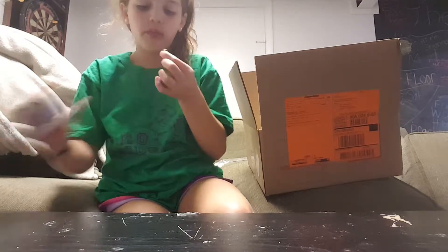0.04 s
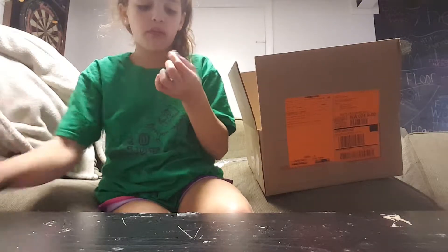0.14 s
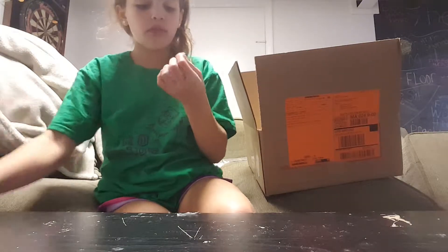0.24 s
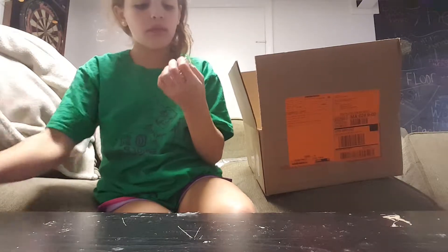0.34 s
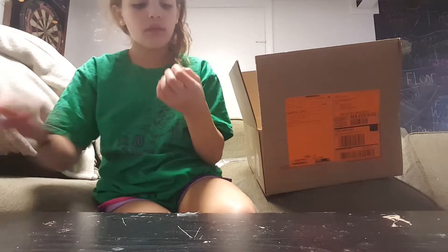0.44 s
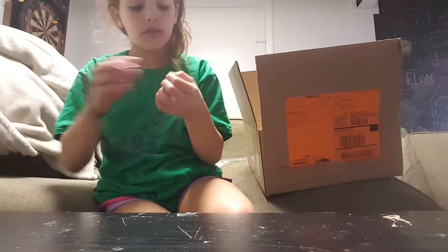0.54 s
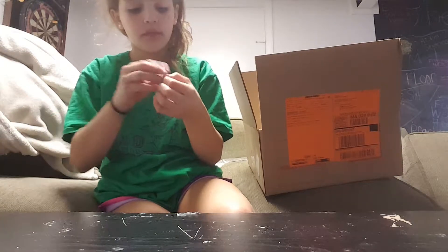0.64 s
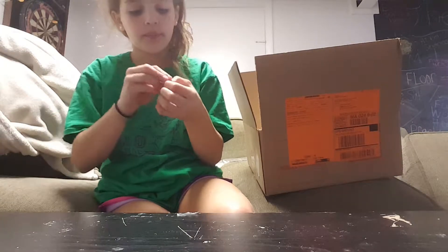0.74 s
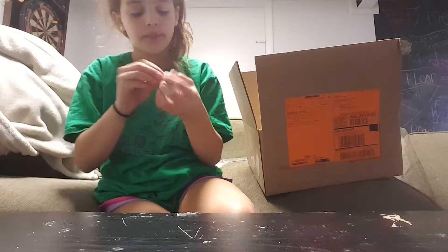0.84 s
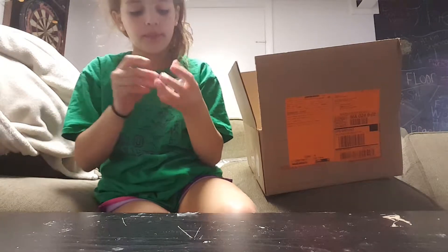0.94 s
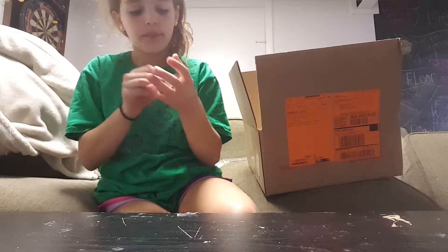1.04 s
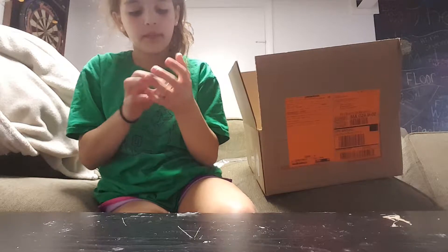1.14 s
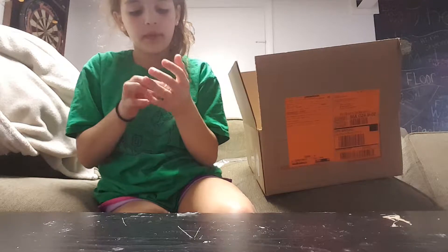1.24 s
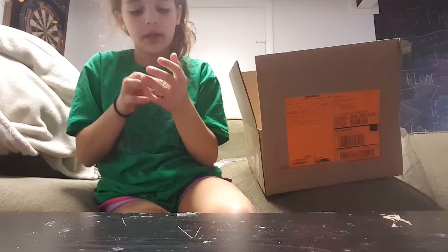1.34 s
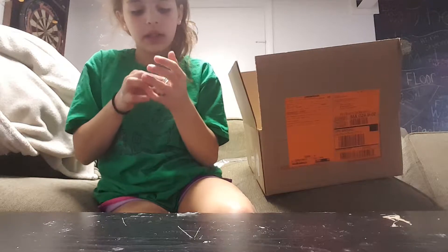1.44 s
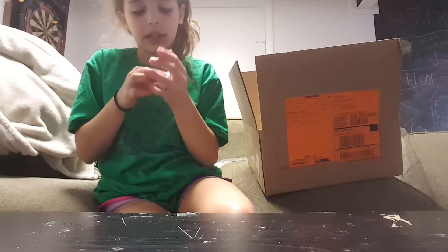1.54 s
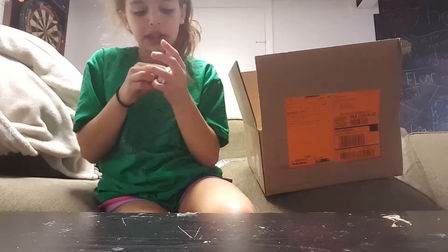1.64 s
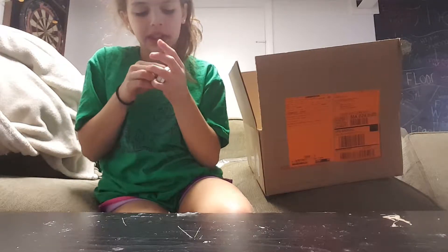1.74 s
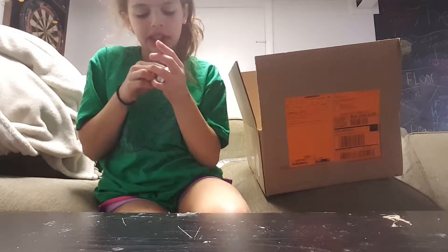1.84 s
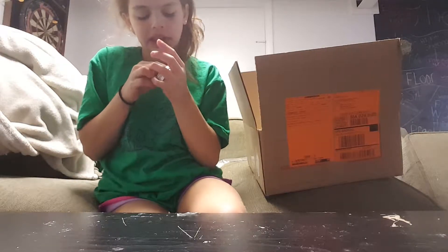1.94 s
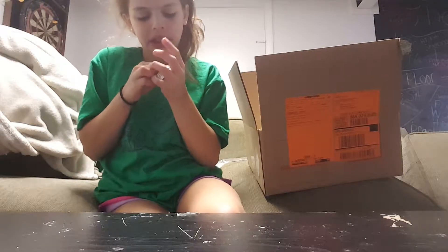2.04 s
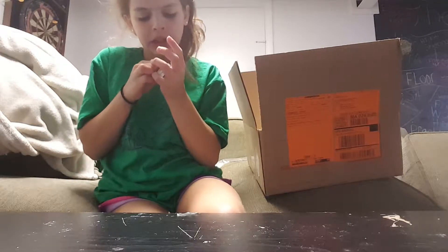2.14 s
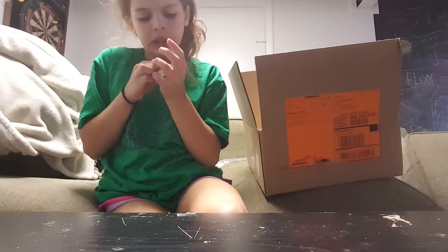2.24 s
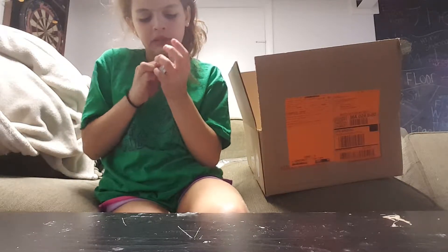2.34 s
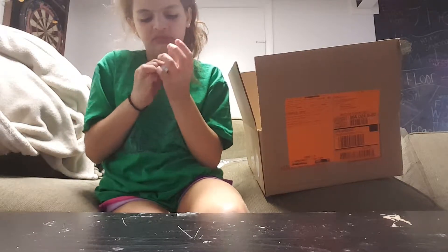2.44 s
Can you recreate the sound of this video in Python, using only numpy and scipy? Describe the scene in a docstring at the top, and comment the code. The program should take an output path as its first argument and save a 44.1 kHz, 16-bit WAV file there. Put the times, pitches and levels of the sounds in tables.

```python
"""A faint tick, then a small metal tin lands on a table to the right, bounces and rattles to rest.
Afterwards fingers pick at sticky putty in a quiet room, while the recorder's gain creeps back up.
The tin is a bank of dying sines struck by listed knocks and random rattle taps, plus contact noise and a thud.
Putty ticks are bursts of noise snaps with a dull ring; shaped noise and hum tones make the background."""
import sys
import numpy as np
from scipy import signal
from scipy.fft import rfft, irfft
from scipy.io import wavfile
from scipy.ndimage import uniform_filter1d

SR = 44100
rng = np.random.default_rng(int(sys.argv[2]) if len(sys.argv) > 2 else 0)


def file_out(sig):
    """Save sig as 16-bit WAV at sys.argv[1]."""
    # one column per channel
    cols = np.atleast_2d(sig).T
    # limit, then scale
    lim = np.clip(cols, -1, 1)
    pcm = np.round(lim * 32767).astype(np.int16)
    wavfile.write(sys.argv[1], SR, pcm)


N = 110250  # samples, 2.5 s


def amp(db):
    """Turns dB into an amplitude factor."""
    return 10 ** (np.asarray(db) / 20)


def evened(x):
    """Scales a sound to an RMS of one."""
    return x / np.sqrt(np.mean(x ** 2) + 1e-20)


def read(points, hz):
    """Reads a curve of (Hz, value) points along a logarithmic pitch axis."""
    f, value = np.transpose(points)
    return np.interp(np.log(hz + 1), np.log(f + 1), value)


def over_time(points, t):
    """Reads a curve of (seconds, value) points."""
    return np.interp(t, *np.transpose(points))


def add(mix, s, sound):
    """Lays a sound into the mix at s seconds, cut off at the end."""
    part = mix[:, round(s * SR):][:, :sound.shape[1]]
    part += sound[:, :part.shape[1]]


def coloured(x, db):
    """Filters along time by a dB value per FFT bin."""
    return irfft(rfft(x) * amp(db), x.shape[-1])


def ring(modes, extra_db, size=9000, on_db=0):
    """Dying sines; each mode reaches the two microphones with its own balance and phase."""
    contact_s = 0.00056  # rise of the ring
    damp_s = 0.014  # contact with the table damps quickly, down to on_db
    hz, db, t60, pan_db, turns = np.transpose(modes)[:, :, None]
    t = np.arange(size) / SR
    side = np.array([.5, -.5])[:, None, None]  # left, right
    rise = np.sin(np.pi / 2 * np.minimum(t / contact_s, 1)) ** 2
    wave = np.sin(2 * np.pi * (hz * t - side * turns)) * rise
    decay = amp(db + extra_db + side * pan_db - 60 * t / t60)
    damped = amp(on_db) + (1 - amp(on_db)) * np.exp(-(t / damp_s) ** 2)
    return (decay * wave).sum(1) * damped


def tin():
    """Knocks and a random rattle ring the same tin; a short noise marks each contact."""
    # Knocks on the table. Each row: start in seconds, level in dB, favoured pitch in Hz,
    # hardness in dB per octave, rim ring in dB relative to the knock.
    knocks = [(.23430, -1, 1182, 0, -40), (.23856, -2, 1182, 1, -40), (.2515, -6, 2290, -2, -50),
              (.2765, -1, 3210, 2, -50), (.2772, -1, 5130, 5, -31), (.2830, -3, 784, -4.5, -20),
              (.3090, -21, 1200, -1, -48), (.3505, -5, 2770, 2, -8), (.3590, -15.5, 4800, 0, -0.5),
              (.4105, -5, 2290, 1, -8), (.4343, -8, 2300, 1, -10), (.4430, -5, 790, 1, -4),
              (.4470, -10, 3020, 2.5, -5), (.4520, -15, 1090, -4, -3)]
    # Tin body. Each row: pitch in Hz, level in dB, T60 in seconds, left minus right in dB, left lag in turns.
    body = [(211, -20, 0.093, 8, 0.3), (437, -13, 0.11, -1, 0.3), (748, -8.5, 0.1, 1.5, 0.23),
            (1181, -6, .045, -1, .1), (1391, -10, 0.029, -1, .15), (1903, -6, .05, 6, .35),
            (2283, -6.5, 0.15, 3.5, .15), (2583, -13, .04, 0.5, 0.17), (2845, -12.5, .06, 2, 0.11),
            (3035, -6, 0.031, -0.5, 0.28), (3350, -14, 0.057, -2.5, 0.32), (4244, -25.5, 0.14, -2, .25),
            (4557, -19, 0.032, -4.5, 0.13), (4710, -16.5, 0.032, -7, 0.29), (6100, -30.5, .05, -0.5, 0.43)]
    # Rim and lid, free to ring once the tin tips on edge. Each row: the same columns as the body.
    rim = [(787, -6, .05, -2, 0.085), (1073.6, -2, .07, 0.15, .1), (3842, -10.5, 0.094, 0, 0.13),
           (6860, -20, 0.13, -2, 0.12), (9800, -33, 0.1, -2, .2), (12380, -39, .09, 0, .2),
           (15100, -47, .08, 0, .2)]
    # Loudness of the rattle. Each row: time in seconds, level in dB.
    rattle = [(.236, -50), (.29, -47), (.335, -57), (.36, -49), (.39, -49), (.405, -52), (.43, -54),
              (.445, -48), (.472, -48), (.488, -66)]
    ring_db, crack_db, uneven_db = -6.5, -9, 3  # ring and contact noise per knock, random spread of modes
    ring_on_db = -10.5  # the part of the body's ring that escapes the table's damping
    thud_hz, thud_db, thud_t60 = 89, -37, 0.35  # table top
    taps_per_s, spread_db, soft_hz = 1800, 5.5, 4630  # rattle density, level spread, treble limit
    rattle_rim_db, rattle_crack_db, tipped_s = -0.5, 8, 0.28  # rim joins in from tipped_s
    low_cut_hz = 56.14  # the tin's sound keeps little deep bass below this

    out = np.zeros((2, N))
    hz = np.array(body)[:, :1]
    t = np.arange(9000) / SR
    thud = amp(thud_db - 60 * t / thud_t60) * np.sin(2 * np.pi * thud_hz * t) * np.ones((2, 1))
    for s, db, near_hz, hard_db, rim_db in knocks:
        shade = colour_db(hz, near_hz, hard_db) + uneven_db * rng.standard_normal(hz.shape)
        ringing = ring(body, shade, on_db=ring_on_db) + ring(rim, rim_db)
        add(out, s, amp(db + ring_db) * ringing)
        # the thud grows with the square of the knock
        add(out, s, amp(db + crack_db) * crack(near_hz, hard_db) + amp(2 * db) * thud)

    taps = rng.choice([-1., 1.], N) * (rng.random(N) < taps_per_s / SR)
    taps *= amp(spread_db * np.minimum(rng.exponential(1, N), 4))
    clock = np.arange(N) / SR
    taps *= amp(over_time(rattle, clock)) * (clock > rattle[0][0]) * (clock < rattle[-1][0])
    soft = signal.sosfilt(signal.butter(2, soft_hz, fs=SR, output="sos"), taps)
    struck = ring(body, 0, on_db=ring_on_db) + amp(rattle_crack_db) * crack(2800, 0)
    out += signal.oaconvolve(soft[None], struck, axes=1)[:, :N]
    tipped = taps * (clock > tipped_s)
    out += signal.oaconvolve(tipped[None], ring(rim, rattle_rim_db), axes=1)[:, :N]
    return signal.sosfilt(signal.butter(2, low_cut_hz, "high", fs=SR, output="sos"), out)


def colour_db(hz, near_hz, hard_db):
    """Where and how hard the tin lands favours one pitch region and tilts the rest."""
    favour_db, favour_oct = 8, 0.051  # height and width of the favoured region
    favoured = favour_db * np.exp(-.5 * (np.log2(hz / near_hz) / favour_oct) ** 2)
    return favoured + hard_db * np.log2(np.maximum(hz, 700) / 2000)


def crack(near_hz, hard_db):
    """Short contact noise; it reaches the left microphone later."""
    # Colour of the contact noise. Each row: pitch in Hz, relative level in dB per Hz.
    contact_colour = [(60, -44), (500, -15), (800, -12.5), (1800, -7), (2800, -11.5), (3800, -19),
                      (5200, -22.5), (7000, -29), (10000, -46), (16000, -64.5)]
    crack_t60, rise_s, left_lag_s = 0.026, 0.00033, 0.00033
    t, hz = np.arange(9000) / SR, np.fft.rfftfreq(9000, 1 / SR) + 20
    shared, own = rng.standard_normal(9000), rng.standard_normal((2, 9000))
    colour = read(contact_colour, hz) + colour_db(hz, near_hz, hard_db)
    noise = evened(coloured(shared + 0.35 * own, colour))
    noise = noise * amp(-60 * t / crack_t60) * np.minimum(t / rise_s, 1)
    return np.array([np.roll(noise[0], round(left_lag_s * SR)), noise[1]])


def ticks():
    """Each tick is a short burst of tiny snaps, each with a bright edge and one dull ring; long ones start softly."""
    # Putty and nail ticks. Each row: start in seconds, length in seconds, ring level in dB, ring pitch in Hz,
    # ring T60 in seconds, snap level in dB, snap pitch in Hz, left minus right in dB.
    picks = [(.1160, 0.00063, -45.5, 1046, 0.049, -57, 2500, 10.5),
             (0.1161, 0.0003, -65, 4230, 0.046, -88, 4050, 0),
             (.8730, 0.0034, -52, 3020, 0.012, -49.5, 4000, 4),
             (1.2885, 0.0029, -59.5, 2500, 0.0098, -57.5, 10980, 0.5),
             (1.3165, 0.0011, -72, 4985, 0.0083, -55, 14500, 7),
             (1.406, 0.00066, -70, 5000, 0.0086, -59.5, 8000, -5),
             (1.431, 0.0051, -50, 2760, 0.018, -56, 9460, 6),
             (1.433, 0.0026, -61, 5400, 0.0089, -48, 13000, -2),
             (1.5800, 0.0013, -63, 1100, 0.062, -48, 7850, 6),
             (1.5856, 0.0031, -55.5, 2550, 0.013, -58, 9000, -2),
             (1.61, 0.0033, -62, 2020, 0.028, -64, 9000, -6),
             (2.072, 0.0073, -61.5, 2270, 0.015, -54, 7000, 2),
             (2.0760, 0.01, -59, 4050, 0.0066, -62.5, 12000, -8),
             (2.24, 0.0005, -45, 430, 0.013, -65, 4430, -1.5),
             (2.266, 0.0025, -66.5, 4000, 0.0082, -60, 11000, 8),
             (2.3010, 0.0018, -58.5, 2980, 0.0057, -65, 10100, 2),
             (2.36, 0.02, -49, 2080, 0.015, -56, 11000, -5),
             (2.358, 0.03, -55, 2700, 0.0085, -63.5, 1200, 1),
             (2.481, 0.017, -57.5, 2260, 0.0098, -62, 6000, 1)]
    snap_t60, snap_oct, after_snap = .006, 1.1, 0.47  # decay, bandwidth, share of noise in later snaps
    spread_s = .01  # longer ticks crackle more, fully from this length
    wobble = .05  # largest share by which the ring pitch strays from snap to snap

    out = np.zeros((2, N))
    t, hz = np.arange(2048) / SR, np.fft.rfftfreq(2048, 1 / SR)
    for s, length, ring_db, ring_hz, t60, snap_db, snap_hz, pan_db in picks:
        band = -6 * (np.log2((hz + 50) / snap_hz) / snap_oct) ** 2
        snap = evened(coloured(rng.standard_normal((2, 2048)), band)) * amp(snap_db - 60 * t / snap_t60)
        snap = snap * amp([[pan_db / 2], [-pan_db / 2]])
        spread = min(1, length / spread_s)
        first = snap + ring([(ring_hz, ring_db, t60, pan_db, .05)], 0, size=2048)
        add(out, s, (1 - spread) * first)
        for when, size, bend in rng.random((10, 3)):
            pitch = ring_hz * (1 + wobble * (2 * bend - 1))
            one = after_snap * snap + ring([(pitch, ring_db, t60, pan_db, .05)], 0, size=2048)
            add(out, s + when * length, one * size * spread)
    return out


def room(x):
    """Sparse reflections of random sign, each band dying at its own speed."""
    # Reverberation. Each row: pitch in Hz, T60 in seconds.
    decay_times = [(200, 0.67), (1000, 0.36), (2300, .25), (4500, .13), (12000, 0.057)]
    taps = np.zeros((2, SR // 2))
    at = np.arange(200, SR // 2 - 20, 20)
    at = at + rng.integers(0, 20, (2, len(at)))
    np.put_along_axis(taps, at, rng.choice([-1., 1.], at.shape), 1)
    hz, t, z = signal.stft(taps, SR, nperseg=256)
    tail = signal.istft(z * amp(-60 * t / read(decay_times, hz)[:, None]), SR, nperseg=256)[1]
    return signal.fftconvolve(x, tail / np.linalg.norm(tail[0]), axes=1)[:, :N]


def floor():
    """Room air and microphone hiss: random short-time spectra with drifting patches and wandering bands."""
    # Colour of the floor. Each row: pitch in Hz, relative level in dB per Hz.
    floor_colour = [(20, -36.5), (45, -17.5), (100, -5), (174, -2), (259, -14), (311, -11), (394, -20),
                    (486, -15), (780, -25.5), (1160, -20.5), (1350, -26.5), (2230, -26), (3670, -33),
                    (6000, -37.5), (10000, -40.5), (14000, -37), (16000, -39.5)]
    # Wander under 230 Hz. Each row: time in seconds, relative level in dB.
    rumble = [(0, -14.5), (.5, -2), (1, 0), (2, 0.5), (2.5, -2)]
    # Wander from 230 to 700 Hz. Each row: time in seconds, relative level in dB.
    low_middle = [(0, -1), (1, 3), (1.6, 0), (2.22, 0), (2.25, 6), (2.35, 4.5), (2.4, 2), (2.5, 3)]
    # Wander from 700 to 4000 Hz. Each row: time in seconds, relative level in dB.
    rustle = [(0, 1), (1, 1.5), (1.6, 0), (2.2, 2), (2.3, 4.5), (2.5, 4)]
    # Stereo width. Each row: pitch in Hz, left-right likeness from -1 to 1.
    likeness = [(60, 0.82), (130, 0.69), (290, 0.85), (640, 0.38), (1410, -0.24), (3100, -0.063),
                (6820, -0.11), (15000, 0.35)]
    floor_db, patch_db = -62, 3.5  # overall RMS level, depth of the patches

    frames, hz = N // 256 + 5, np.fft.rfftfreq(1024, 1 / SR)
    a, b, c, d, patches = rng.standard_normal((frames, 513, 5)).T
    patches = uniform_filter1d(uniform_filter1d(patches, size=10, axis=0), size=10, axis=1)
    patches = evened(patches)
    t = np.arange(frames) * 256 / SR
    low, mid, high = (1 / (1 + (hz[:, None] / edge) ** 6) for edge in (230, 700, 4000))
    wander = low * over_time(rumble, t)
    wander = wander + (mid - low) * over_time(low_middle, t)
    wander = wander + (high - mid) * over_time(rustle, t)
    same = np.clip(read(likeness, hz), -1, 1)[:, None]
    left = a + 1j * b
    right = same * left + np.sqrt(1 - same ** 2) * (c + 1j * d)
    z = np.array([left, right])
    z *= amp(read(floor_colour, hz)[:, None] + patch_db * patches + wander)
    return amp(floor_db) * evened(signal.istft(z, nperseg=1024, noverlap=768)[1][:, :N])


def hum():
    """Mains hum: faint steady tones, alike in both channels."""
    # Hum tones. Each row: pitch in Hz, level in dB.
    hum_tones = [(119, -70.5), (239, -81), (359, -80.5)]
    t = np.arange(N) / SR
    return sum(amp(db) * np.sin(2 * np.pi * (hz * t + rng.random())) for hz, db in hum_tones)


def scene():
    """Tin and putty with their reverberation, over the floor and hum."""
    room_db = -29
    near = tin() + ticks()
    return near + amp(room_db) * room(near) + floor() + hum()


def record(dry):
    """Gain control ducks after loud sound, holds, then recovers; the loudest peaks clip."""
    duck_from_db, duck_share = -34, 0.38  # threshold, dB of ducking per dB above it
    attack_s, hold_s, recover_s = 0.07, 0.39, 0.34  # hold counts from the loud moment
    clip, edge_hz = .95, 16300  # peak limit, treble edge of the recorder
    power = uniform_filter1d((dry ** 2).mean(0), size=441)[::441]  # every 10 ms
    power_db = 10 * np.log10(abs(power) + 1e-12)
    over = duck_share * np.maximum(power_db - duck_from_db, 0)
    t = np.arange(len(over)) / 100
    since = t[:, None] - t[None]  # seconds since each earlier moment
    memory = np.clip(since / attack_s, 0, 1) * np.exp(-(np.maximum(since - hold_s, 0) / recover_s) ** 2)
    duck_db = np.interp(np.arange(N) / SR, t, (memory * over[None]).max(1))
    out = np.clip(dry / amp(duck_db), -clip, clip)
    low_pass = signal.firwin(255, edge_hz, window=("kaiser", 9), fs=SR)
    return signal.oaconvolve(out, low_pass[None], "same")


dry = scene()
out = record(dry)
file_out(out)
```